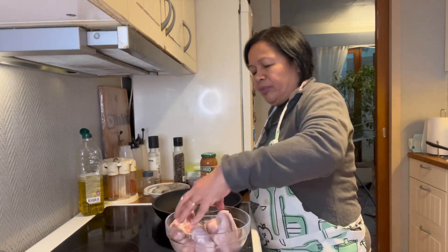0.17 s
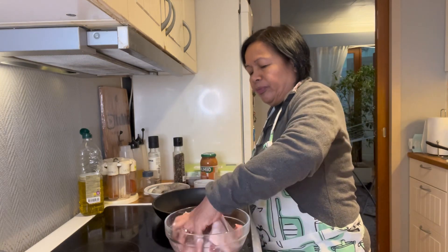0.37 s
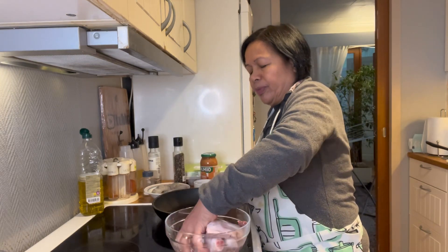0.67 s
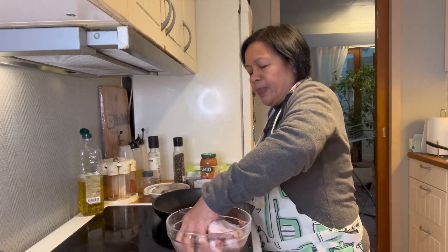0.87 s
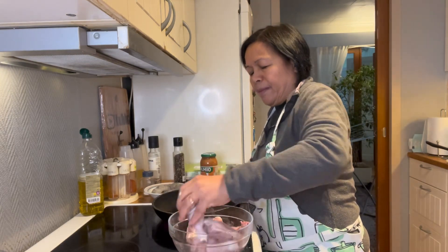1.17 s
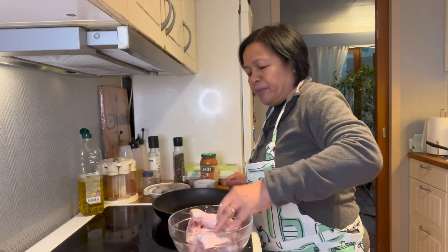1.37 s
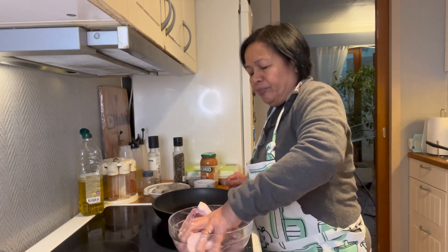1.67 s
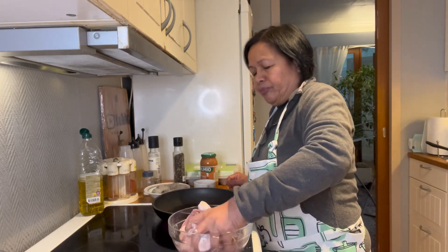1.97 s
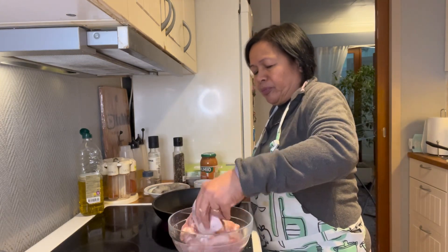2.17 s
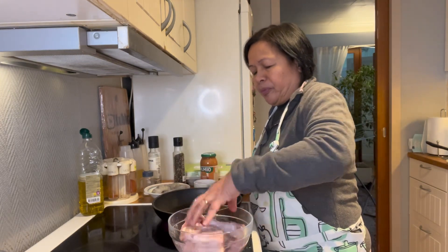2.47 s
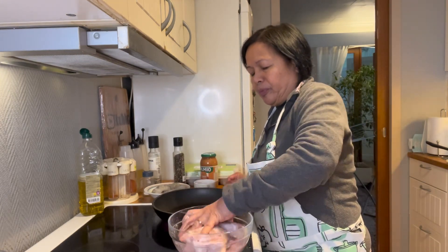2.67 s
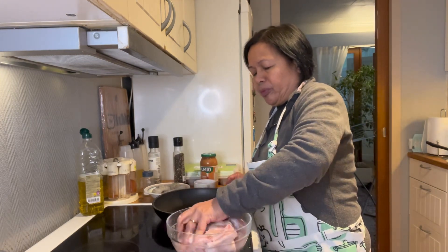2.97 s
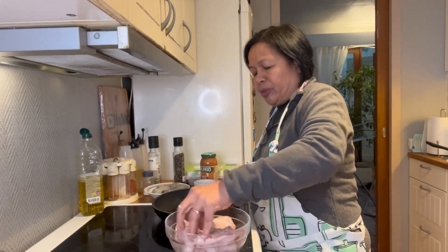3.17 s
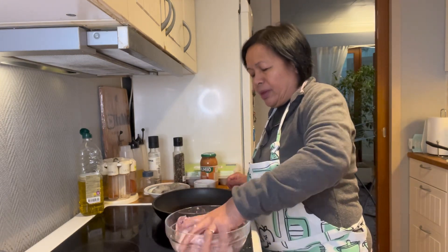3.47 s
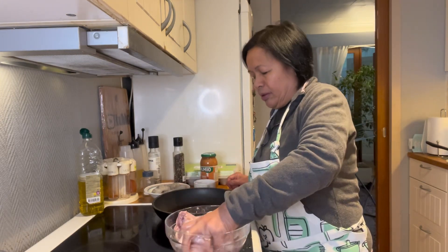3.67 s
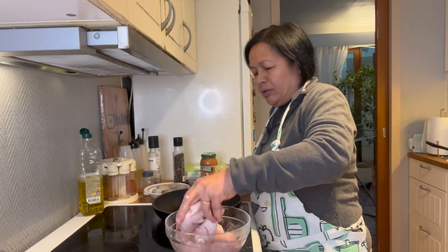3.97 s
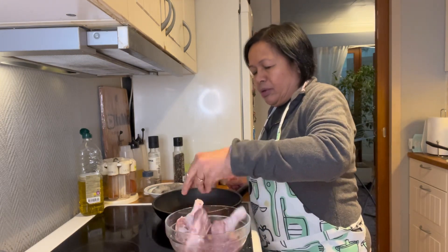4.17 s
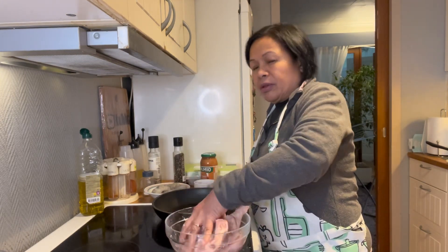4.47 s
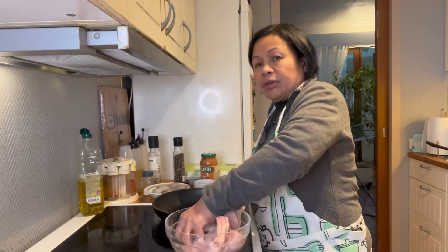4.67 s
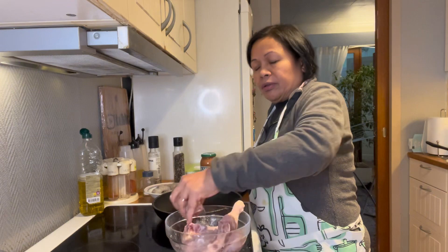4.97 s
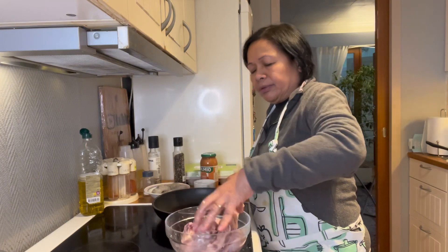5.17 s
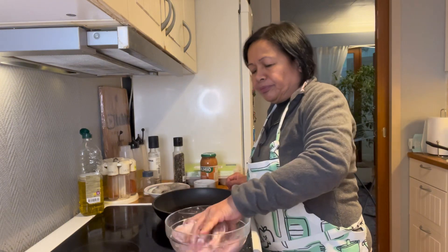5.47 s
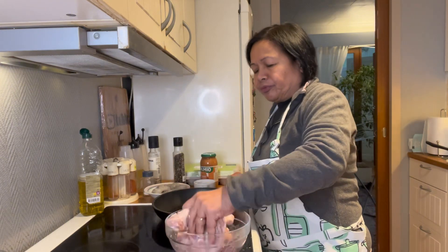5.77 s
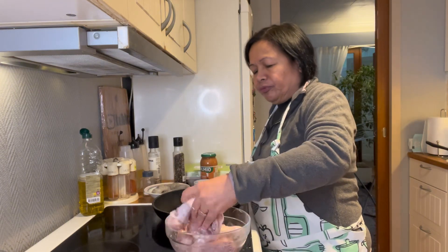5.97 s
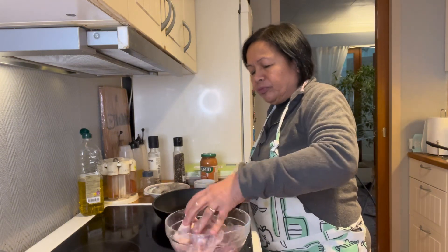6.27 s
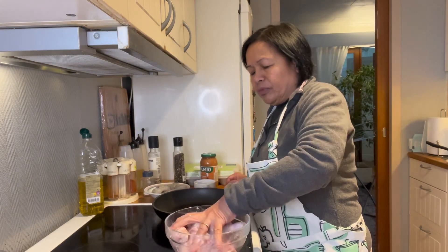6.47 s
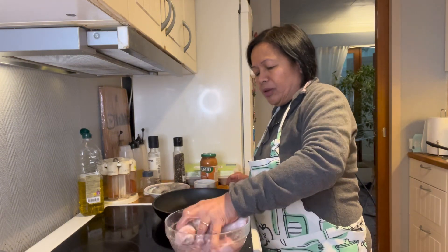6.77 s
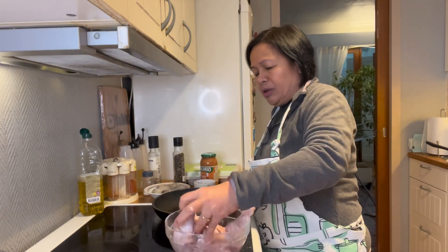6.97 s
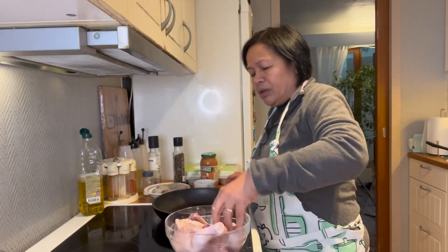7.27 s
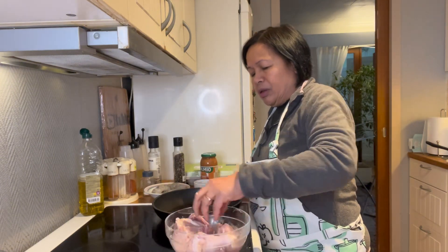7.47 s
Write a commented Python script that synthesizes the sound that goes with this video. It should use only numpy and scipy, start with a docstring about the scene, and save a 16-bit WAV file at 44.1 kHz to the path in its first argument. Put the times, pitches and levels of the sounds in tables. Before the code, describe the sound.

Wet chicken pieces squish and slap under a mixing hand while their glass bowl bumps the hob and occasionally clinks.

```python
"""A small kitchen, where a hand turns oiled raw chicken in a glass bowl on a glass hob.
Impacts excite normal modes: the bowl thumps the hob, and now and then bone or a ring clinks on the bowl.
Cavities resonate as the pieces slap together and air pockets suck open; the oil film ticks as it tears.
Under these lie squelching, rubbing, a low rumble and the still air. The sound is heard from the counter,
both directly and as the room's reverberation, with a stereo colouring that widens it."""
import sys
import numpy as np
from scipy import signal
from scipy.fft import rfft, irfft, next_fast_len
from scipy.io import wavfile
from scipy.ndimage import uniform_filter1d, map_coordinates

SR = 44100
rng = np.random.default_rng(int(sys.argv[2]) if len(sys.argv) > 2 else 0)


def log_audio(samples):
    """Write samples as a 16-bit WAV file to the path given in sys.argv[1]."""
    # one column per channel
    frames = np.atleast_2d(samples).T
    # limit to full scale, then quantise
    limited = np.clip(frames, -1, 1)
    pcm = np.round(limited * 32767).astype(np.int16)
    wavfile.write(sys.argv[1], SR, pcm)


N = 335160

# The still air. Each row: frequency in Hz, relative spectral density in dB.
AIR_SPECTRUM = [(15, -43), (25, -19), (66, -2.5), (113, 0), (221, -24), (305, -4), (378, -18), (826, -18.5),
                (2560, -49.5), (5580, -30), (7700, -31), (11200, -29.5), (15500, -78)]
# The kitchen's reverberation. Each row: frequency in Hz, time to fall 60 dB in seconds, gain in dB.
ROOM_DECAY = [(106, 0.7, -6.5), (475, 0.23, 0), (970, 0.3, -1), (1830, 0.27, -0.5), (4900, 0.23, -0.5),
              (11500, 0.44, -5)]
# Stereo width of the background and reverberation: centred in the bass, wide in the middle, mono above
# 11 kHz. Each row: frequency in Hz, left-right likeness from 0 (wide) to 1 (mono).
STEREO_LIKENESS = [(60, 1), (150, 0.86), (300, 0.68), (600, 0.17), (3000, 0.0057), (8000, 0.21), (11000, 1)]
# The hand at work. Each row: time in seconds, then levels in dB of hob rumble, squish and oil fizz.
HAND_EFFORT = [(0.0, -85, -88, -102), (0.08, -52, -80, -68), (0.22, -59.5, -77, -93), (0.38, -52, -74, -72),
               (0.82, -59, -74, -77.5), (1.33, -68, -83.5, -109), (1.52, -56, -64, -74),
               (1.74, -45.5, -62, -66), (2.08, -59.5, -85, -89), (2.2, -60, -71, -59),
               (2.36, -72, -98, -97), (2.55, -55, -65, -68.5), (2.79, -59, -68.5, -71),
               (3.1, -50, -80, -79), (3.41, -62.5, -83, -106), (3.68, -53, -67, -68),
               (4.04, -51.5, -75, -78), (4.42, -51.5, -63.5, -72), (4.6, -56, -65, -67),
               (4.69, -61, -90, -64), (4.82, -63, -75, -77), (5.08, -63.5, -103, -97),
               (5.35, -56.5, -71, -78), (5.65, -53.5, -70, -59.5), (5.88, -57.5, -82, -102),
               (6.39, -62.5, -78, -104), (6.58, -54, -69, -72), (6.74, -61, -78.5, -80),
               (6.86, -69, -77, -75), (6.96, -62, -65.5, -68.5), (7.17, -55.5, -76.5, -87),
               (7.42, -55.5, -77, -93), (7.6, -60.5, -59.5, -73)]
# The hob under the hand's weight. Each row: frequency in Hz, relative spectral density in dB.
RUMBLE_SPECTRUM = [(25, -2), (45, 11.5), (65, 5.5), (110, 6.5), (200, -5), (330, -10), (420, -38.5)]
# Skin sliding over wet meat. Each row: time in seconds, level in dB.
RUB_LEVELS = [(0.0, -76.5), (0.08, -85), (0.38, -73.5), (1.33, -85.5), (1.5, -76.5), (1.78, -68.5),
              (2.09, -77.5), (2.24, -78), (2.5, -83), (2.67, -80.5), (3.02, -67), (3.24, -93), (3.51, -78),
              (3.68, -71), (4.13, -79), (4.36, -72), (4.66, -80.5), (4.91, -91), (5.14, -79), (5.33, -76),
              (5.63, -73), (5.88, -83), (6.43, -84), (6.58, -71.5), (7.22, -86), (7.6, -72)]
# Modes of the bowl. Each row: frequency in Hz, relative level in dB, time to fall 60 dB in seconds.
BOWL_MODES = [(452, -4, .45), (1204, -4, .63), (2215, -5, .2), (3430, -4, .1), (4826, -5, .07),
              (6360, -8, .055)]
# Bone or ring on the glass. Each row: start in seconds, level in dB, hardness in dB per octave,
# relative level of the rim's sway in dB, seconds until the meat damps it, factor on the decay times.
BOWL_CLINKS = [(0.245, -61.5, 3.5, 8, 0.017, 2.6), (2.490, -49, -2.5, -6, 0.038, 1.3),
               (2.534, -49, 0.5, -7, 0.03, 1.9), (4.193, -40.5, -18, -1, 0.02, 1.1),
               (4.209, -31, -45, -19, 0.3, 0.8), (4.375, -54.5, 1, -5, 0.095, 2.1),
               (5.219, -52, 8, -2.5, 0.44, 1.3), (7.247, -52, -31, 14, 0.16, 0.94)]
# Modes of the hob. Each row: frequency in Hz, relative level in dB, time to fall 60 dB in seconds.
HOB_MODES = [(60.95, -1, 0.53), (76.8, -16, 0.76), (101.85, -2, 0.35), (130, -2, 0.33), (145.7, -3, 0.2),
             (175, 1.5, 0.22), (223.8, -0.5, 0.14), (267.7, 7, 0.16), (318.3, 5.5, 0.26),
             (396.8, -1.5, 0.31)]
# The bowl landing on the hob. Each row: start in seconds, peak level in dB, centre frequency in Hz.
HOB_THUMPS = [(0.064, -39.5, 85), (0.268, -31.5, 109), (0.271, -28, 186), (0.292, -37, 150),
              (0.348, -31, 166), (0.821, -43.5, 124), (1.324, -41, 122), (1.395, -29.5, 208),
              (1.406, -27.5, 136), (1.663, -37, 170), (1.68, -30.5, 130), (1.706, -40, 111),
              (1.74, -34.5, 111), (1.858, -33, 120), (2.141, -38.5, 95), (2.221, -42, 62),
              (2.475, -44, 176), (2.5, -31, 136), (2.545, -41.5, 116), (2.597, -38, 104), (2.715, -39, 130),
              (2.729, -33.5, 118), (2.886, -42.5, 159), (2.893, -37, 148), (3.028, -40, 193),
              (3.582, -41, 125), (3.646, -44, 130), (3.663, -39.5, 106), (3.805, -47, 70),
              (3.894, -30.5, 130), (4.027, -50.5, 137), (4.209, -27, 182), (4.219, -28.5, 159),
              (4.371, -41.5, 184), (4.603, -46, 81), (4.789, -43.5, 83), (4.866, -47, 104),
              (5.153, -44.5, 69), (5.213, -36, 126), (5.25, -40.5, 119), (5.267, -41, 117),
              (5.52, -42, 120), (5.538, -33, 107), (5.618, -41, 110), (5.653, -32, 121), (5.691, -32, 130),
              (5.771, -40, 99), (5.873, -49, 85), (6.081, -32.5, 135), (6.152, -37, 118),
              (6.456, -33.5, 109), (6.5, -43, 107), (6.954, -30.5, 126), (6.996, -34.5, 112),
              (7.258, -32, 162), (7.368, -38.5, 190)]
# Air pockets sucking open. Each row: start in seconds, level in dB, pitch in Hz, decay time in cycles.
POCKET_POPS = [(0.886, -50, 642, 2.8), (0.965, -48, 3950, 20), (1.025, -59.5, 795, 2.3),
               (1.067, -44.5, 683, 5.1), (1.31, -50, 635, 2), (1.718, -40, 580, 3.6),
               (2.623, -48.5, 850, 2.2), (2.624, -43.5, 3940, 11), (4.029, -40, 3420, 5.3),
               (4.7055, -45.5, 2930, 11.4), (4.795, -44, 880, 4.6), (4.796, -54, 1420, 10.4),
               (4.832, -49.5, 828, 4), (4.996, -54, 664, 2.7), (5.297, -41, 847, 7.3),
               (5.5362, -39, 6250, 5.2), (7.205, -60.5, 1380, 3.7)]
# The oil film tearing. Each row: start in seconds, level in dB, centre in Hz, hiss over snap in dB.
FILM_TICKS = [(0.0434, -37.5, 4900, 10), (0.052, -38.5, 3120, -17), (0.197, -69, 9000, 8),
              (0.2594, -35.5, 3000, -49), (0.271, -33, 3450, -30), (0.329, -37.5, 2240, -25),
              (0.3439, -50, 2930, -21), (0.398, -48.5, 8050, 11.5), (0.535, -54.5, 8500, 8.5),
              (0.709, -52.5, 5200, 5), (0.721, -53, 2500, -15), (0.765, -51.5, 5600, -23),
              (0.8, -50, 5800, -23), (0.872, -52, 5800, -13), (0.889, -52, 4150, -1),
              (0.9936, -46.5, 3470, -31), (1.066, -44, 5100, -25), (1.155, -46.5, 11800, -10),
              (1.291, -45.5, 2700, -10), (1.293, -48.5, 4600, 7), (1.428, -53, 8400, -14),
              (1.551, -54, 5040, -4), (1.583, -69, 5000, 3), (1.606, -53, 4930, -1),
              (1.636, -50, 5700, 4.5), (1.719, -44, 3100, -17), (1.7345, -48, 4340, -13),
              (1.758, -60, 9000, 16), (1.7904, -41.5, 3940, -1), (1.8283, -39, 4240, -22),
              (1.9131, -50, 3100, 12), (2.038, -54, 5060, -4), (2.108, -38, 4580, -2),
              (2.1282, -33, 3500, 2.5), (2.1303, -26.5, 3000, -19), (2.218, -40.5, 5100, -15),
              (2.363, -66, 7350, 17.5), (2.466, -46.5, 6200, 8.5), (2.4996, -46, 3180, -5),
              (2.5366, -46.5, 3450, 3), (2.6728, -47.5, 4940, -23), (2.762, -46, 3060, -7),
              (2.7753, -47.5, 2830, -13), (2.7978, -42, 4800, -25), (2.8647, -48, 4060, -19),
              (2.8837, -66, 3050, -23), (2.9044, -40, 3830, -13), (2.953, -56.5, 7000, 17.5),
              (3.013, -37.5, 8000, 1), (3.0253, -38, 5230, -17), (3.1447, -48, 4420, 2.5),
              (3.2804, -51.5, 4700, 1), (3.414, -67.5, 7000, 20), (3.441, -59, 5000, -20),
              (3.4748, -55, 5000, -5), (3.491, -40.5, 3460, -3.5), (3.5463, -46, 2430, 5),
              (3.6127, -36, 4230, 11), (3.642, -47, 4000, -5), (3.7, -56, 9700, -5), (3.7373, -41, 5350, 8),
              (3.8112, -46, 3400, 3), (3.844, -41.5, 3470, -8), (4.065, -45, 9200, -8),
              (4.1175, -50, 6260, 6.5), (4.1674, -56.5, 3900, 15.5), (4.2078, -29, 3180, -32),
              (4.222, -31, 1880, -30), (4.299, -41, 4350, -10), (4.445, -45, 2230, -9),
              (4.506, -59, 7040, 14), (4.525, -38.5, 4600, 5), (4.779, -44, 4140, 1),
              (4.797, -61, 3420, -20), (4.833, -48.5, 4260, -18), (4.885, -55, 3950, -18),
              (4.996, -57, 2310, 5), (5.1124, -45.5, 5840, 10), (5.1376, -38.5, 3550, 2.5),
              (5.22, -46, 3500, -31), (5.2824, -40, 3600, 2.5), (5.3768, -44.5, 2600, -1),
              (5.4103, -40, 2470, -5), (5.441, -54, 3400, -17), (5.515, -52, 3100, 7.5),
              (5.6142, -46, 5200, 7), (5.6441, -38, 2750, -35), (5.6838, -38, 2860, -30),
              (5.98, -52, 9050, -4), (6.047, -48.5, 2620, 7), (6.0752, -36, 2760, -27),
              (6.148, -41.5, 10900, -20), (6.3495, -68.5, 7000, 22.5), (6.3882, -58.5, 5170, 14.5),
              (6.413, -48.5, 2380, -21), (6.439, -49, 3050, -24), (6.49, -49.5, 4150, -2),
              (6.5206, -50, 2820, 10), (6.5423, -34.5, 7100, -27), (6.558, -44.5, 2460, 6.5),
              (6.6046, -44.5, 4320, 6), (6.765, -54, 5460, 9.5), (6.881, -56, 7000, 17),
              (6.928, -46.5, 2820, 12.5), (6.96, -44, 6200, -15), (6.991, -50.5, 6160, 6),
              (7.062, -43, 9500, -4), (7.1591, -42.5, 5860, -10), (7.197, -42.5, 6140, -12),
              (7.2794, -47.5, 4700, -2), (7.3602, -55, 3540, 11.5), (7.405, -54, 5330, -20),
              (7.57, -54, 6500, -24)]
# Two resonances that colour the hiss of a tear. Each row: centre in Hz, quality factor.
HISS_BANDS = [(11900, 0.4), (13900, 0.6)]
# Meat on meat. Each row: start in seconds, level in dB, cavity resonance in Hz, spray over slap in dB.
MEAT_SLAPS = [(0.05, -43.5, 1350, 2), (0.259, -32.5, 1030, -8), (0.269, -23.5, 790, -6.5),
              (0.292, -35, 1500, -24), (0.341, -33.5, 560, 3), (0.522, -51, 780, -5.5),
              (0.554, -48, 624, -18), (0.968, -53, 497, -23), (1.392, -30.5, 470, -17),
              (1.659, -37.5, 540, -0.5), (1.791, -36, 1340, -12), (1.848, -39, 700, -29),
              (1.915, -48.5, 1190, -12), (1.995, -50, 2030, -27), (2.129, -35, 1500, -4),
              (2.138, -49, 1550, -18), (2.463, -60, 1510, 10), (2.496, -38.5, 660, -1),
              (2.708, -41, 644, -1), (2.885, -39, 620, -6), (3.014, -43.5, 870, -3),
              (3.024, -34.5, 690, -26), (3.145, -49, 560, 4.5), (3.191, -53, 485, -27),
              (3.492, -47.5, 950, -3), (3.545, -55.5, 1270, 10), (3.613, -45, 1800, 6.5),
              (3.642, -48.5, 604, -24), (3.885, -35, 590, -15), (4.066, -49.5, 476, -2),
              (4.165, -49, 626, -20), (4.193, -33, 710, -5.5), (4.208, -24.5, 660, -11),
              (4.224, -34.5, 790, -6), (4.604, -52, 900, -10), (4.622, -47.5, 880, -13),
              (5.109, -53.5, 640, 2), (5.223, -41, 475, 0.5), (5.433, -49.5, 1240, -22),
              (5.518, -44, 564, 2.5), (5.644, -32.5, 560, -7.5), (5.683, -34, 547, -1),
              (5.793, -47.5, 1440, -29), (6.077, -30, 490, -2), (6.439, -39, 580, -1.5),
              (6.564, -47, 1130, -1), (6.77, -55, 1900, -20), (6.949, -44.5, 730, -15),
              (7.001, -46.5, 535, -15), (7.244, -35, 530, -36)]
# Acoustic shadow on direct sound. Each row: frequency in Hz, left over right in dB.
DIRECT_SHADOW = [(350, -2), (750, 13.5), (1200, -1), (4000, -1)]
# The colour that both channels share. Each row: frequency in Hz, gain in dB.
SHARED_GAIN = [(25, -20.5), (60, 3), (6000, -4.5), (7800, -7.5), (10000, -8), (13600, -11), (14300, -19),
               (15700, -38)]
# A left-right phase shift that widens the sound. Each row: frequency in Hz, lead of the left in radians.
LEFT_LEAD = [(60, 0.22), (180, 0.52), (300, 0.91), (500, 1.95), (750, 2.5), (1210, 5.69), (2070, 6.6),
             (2840, 3.7), (3880, 8.08), (6800, 14.76), (9300, 17.5), (10100, 16.77), (12500, 23.2),
             (14000, 20.2)]
# Stereo balance. Each row: frequency in Hz, left over right in dB.
LEFT_GAIN = [(60, 0.5), (150, 2), (380, -0.5), (650, 0), (950, 0.5), (2380, 1.5), (5980, -2.5),
             (15000, 2.5)]

TAILS = 5  # independent reverberant tails, each fed by a track; one more track bypasses the room
CLUMPS_PER_S = 30  # rate at which the wet grains change level together
SIDES = np.array([[.5], [-.5]])  # splits a difference between left and right


def amp(db):
    """Amplitude ratio of a level in decibels."""
    return 10 ** (np.asarray(db) / 20)


def unit(x):
    """Normalisation to an rms of 1."""
    return x / np.sqrt(np.mean(x ** 2) + 1e-20)


def peak(x, db):
    """Normalisation of the largest swing to a level in dB."""
    return amp(db) * x / np.abs(x).max()


def along(points, hz):
    """Interpolation of a table's second column on a logarithmic frequency axis."""
    rows = np.transpose(points)
    return np.interp(np.log(hz + 1), np.log(rows[0] + 1), rows[1])


def envelope(points, column=1):
    """Amplitude at each sample, by interpolation of levels in dB over time."""
    rows = np.transpose(points)
    return amp(np.interp(np.arange(N) / SR, rows[0], rows[column]))


def filtered(x, response):
    """Linear filtering: the spectrum is multiplied by a frequency response."""
    size = next_fast_len(x.shape[-1] + 4096)
    return irfft(rfft(x, size) * response(np.fft.rfftfreq(size, 1 / SR)), size)[..., :x.shape[-1]]


def resonance(hz, q):
    """Band-pass response of a damped oscillator, with gain 1 at hz."""
    return lambda f: 1j * f * hz / q / (hz * hz - f * f + 1j * f * hz / q)


def stereo_spread(pair, spectrum):
    """Mid-side mixing: two independent signals are coloured and given a width that varies with pitch."""
    def weights(hz):
        angle = np.arccos(np.clip(along(STEREO_LIKENESS, hz), -1, 1)) / 2
        return amp(along(spectrum, hz)) * [np.cos(angle), np.sin(angle)]
    mid, side = filtered(pair, weights)
    return np.array([mid + side, mid - side])


def spatter(t, spread_s):
    """Impulsive noise: two trains of pressure steps swell and die within a few times spread_s."""
    age = t / np.clip(spread_s, .0002, .02)
    steps = rng.standard_normal((2, len(t))) * rng.exponential(1, len(t)) * age ** 2 * np.exp(-1.6 * age)
    return steps / np.linalg.norm(steps, axis=1, keepdims=True)


def add(tracks, k, start, sound, pan_db=0, shelter_db=0):
    """Superposition of event k; a source deep in the bowl reaches the room weaker by shelter_db."""
    i = round(start * SR)
    n = min(len(sound), N - i)
    panned, room_share = sound[:n] * amp(pan_db * SIDES), amp(-shelter_db)
    tracks[k % TAILS, :, i:i + n] += room_share * panned
    tracks[TAILS, :, i:i + n] += (1 - room_share) * panned


def still_air():
    """Ambient noise: a faint, steady background fills the kitchen."""
    return amp(-66.5) * unit(stereo_spread(rng.standard_normal((2, N)), AIR_SPECTRUM))


def reverberation(tracks):
    """Reverberant decay: the room's answer dies exponentially, each frequency at its own rate."""
    hz, t, noise = signal.stft(rng.standard_normal((TAILS, 2, SR // 3)), SR, nperseg=256)
    t60 = along(ROOM_DECAY, hz)[:, None]
    tails = signal.istft(noise * amp(-60 * t / t60) / np.sqrt(t60), SR, nperseg=256)[1]
    tails /= np.linalg.norm(tails, axis=-1, keepdims=True)
    colour = np.array(ROOM_DECAY)[:, ::2]
    tails = np.array([stereo_spread(pair, colour) for pair in tails])
    delayed = np.pad(tails, ((0, 0), (0, 0), (130, 0)))  # reflections arrive 3 ms late
    return signal.oaconvolve(tracks, delayed, axes=-1)[..., :N].sum(0)


def hob_rumble():
    """Forced vibration: the hand's weight keeps the hob rumbling in lumps."""
    lumps_db = 2.0 * map_coordinates(rng.standard_normal(N // 3000 + 4), [np.arange(N) / 3000])
    noise = filtered(rng.standard_normal(N), lambda hz: amp(along(RUMBLE_SPECTRUM, hz)))
    return envelope(HAND_EFFORT) * unit(amp(lumps_db) * noise)


def skin_rub():
    """Sliding friction: tiny random slips of skin over wet meat make a broad band of noise."""
    slips = rng.standard_normal(N) * rng.exponential(1, N)
    return envelope(RUB_LEVELS) * unit(filtered(slips, lambda f: resonance(1880, q=0.72)(f) ** 2))


def wet_grains(count, hz, octaves, decay_cycles):
    """Damped oscillation: many small bubbles or ticks of random size and pitch sound in sticky clumps."""
    rise_cycles, size_scatter_db, clump_scatter_db = 0.27, 6, 5.5
    when, tone, size = rng.random((count, 3)).T
    pitch = np.clip(hz * 2 ** (octaves * (2 * tone - 1)), 100, 15000)[:, None]
    samples = np.arange(400)
    cycles = pitch * samples / SR
    shape = np.exp(-cycles / decay_cycles) * (1 - np.exp(-cycles / rise_cycles))
    clumps_db = clump_scatter_db * rng.standard_normal(int(CLUMPS_PER_S * N / SR) + 2)
    clump = (when * N / SR * CLUMPS_PER_S).astype(int)
    level_db = clumps_db[clump] - size_scatter_db * np.log(size + 0.058)
    grains = amp(level_db)[:, None] * shape * np.sin(2 * np.pi * cycles)
    index = (when * N).astype(int)[:, None] + samples
    return unit(np.bincount(index.ravel(), grains.ravel(), N)[:N])


def squelch(tracks):
    """Incoherent addition: bubbles, oil fizz and rubbing merge into a texture that follows the hand."""
    squish = envelope(HAND_EFFORT, 2) * wet_grains(count=1600, hz=1060, octaves=1.126, decay_cycles=2.1)
    fizz = envelope(HAND_EFFORT, 3) * wet_grains(count=7000, hz=6190, octaves=1.29, decay_cycles=1.27)
    texture = squish + fizz + skin_rub()
    tail = np.arange(N) * CLUMPS_PER_S // SR % TAILS  # successive clumps feed different tails
    for k in range(TAILS):
        tracks[k] += texture * uniform_filter1d(1. * (tail == k), size=400)


def bowl_clinks():
    """Free vibration: harder contact favours the bowl's upper modes, which ring until meat damps them."""
    damping_db_per_s, rise_s = 500, 0.00035
    out, t = np.zeros(N + SR), np.arange(SR // 2) / SR
    hz, mode_db, t60 = np.array(BOWL_MODES).T[:, :, None]
    for start, db, hardness, sway_db, free_s, decay_factor in BOWL_CLINKS:
        level_db = db + mode_db + hardness * np.log2(hz / hz[1])
        level_db[0] = db + sway_db  # the rim's sway depends on where the blow lands
        decay_db = 60 * t / (t60 * decay_factor) + damping_db_per_s * np.clip(t - free_s, 0, None)
        modes = amp(level_db - decay_db) * np.sin(2 * np.pi * hz * t)
        out[round(start * SR):][:len(t)] += modes.sum(0) * (1 - np.exp(-t / rise_s))
    return out[:N]


def hob_thumps():
    """Modal excitation: a landing favours low modes near its centre; a harder one adds upper modes."""
    upper_from_hz, rise_s, punch_s = 250, 0.0068, 0.016
    out, t = np.zeros(N + SR), np.arange(SR // 2) / SR
    hz, mode_db, t60 = np.array(HOB_MODES).T[:, :, None]
    attack = (1 - np.exp(-t / rise_s)) * (1 + 2.32 * np.exp(-t / punch_s))  # first cycles swing wider
    for start, db, centre_hz in HOB_THUMPS:
        scatter, detune = rng.standard_normal((2, len(HOB_MODES), 1))
        upper_db = -21.5 + 12 * np.log2(centre_hz / 130)
        lower_db = -11.5 * np.abs(np.log2(hz / centre_hz))
        level_db = mode_db + np.where(hz > upper_from_hz, upper_db, lower_db) + 3.04 * scatter
        modes = amp(level_db - 60 * t / t60) * np.sin(2 * np.pi * hz * (1 + 0.043 * detune) * t)
        out[round(start * SR):][:len(t)] += peak(modes.sum(0) * attack, db)
    return out[:N]


def pocket_pops(tracks):
    """Bubble resonance: an air pocket opens with a spatter and rings briefly, climbing in pitch."""
    opening_s, climb = 0.002, 0.103
    t = np.arange(SR // 10) / SR
    for k, (start, db, hz, cycles) in enumerate(POCKET_POPS):
        age = t * hz / cycles
        glide = 1 + climb * (np.minimum(age, 4) - 1) / 2
        ring = (1 - np.exp(-t / opening_s)) * np.exp(-age) * np.sin(2 * np.pi * hz * t * glide)
        rough = filtered(spatter(t, 2 * opening_s)[0], resonance(hz, q=9.3))
        add(tracks, k, start, peak(ring, db) + peak(rough, db), shelter_db=6)


def film_ticks(tracks):
    """Rupture: the oil film snaps and rings the gap, air hisses through, and the film peels on."""
    t = np.arange(SR // 20) / SR
    for k, (start, db, hz, hiss_db) in enumerate(FILM_TICKS):
        tear_s = 0.0016 * amp(0.25 * (db + 43.5))  # a louder tear lasts longer
        snap, hiss = spatter(t, tear_s)[0], spatter(t, spread_s=0.003)[1]
        pan_db = 5.5 * rng.standard_normal()
        peel = spatter(t, spread_s=0.01) * rng.exponential(1, len(t)) ** 2  # sparse, sticky steps
        snap, hiss = np.array([snap, hiss]) + amp(-10) * peel / np.linalg.norm(peel, axis=1)[:, None]
        snap = filtered(filtered(snap, resonance(hz, q=3.2)), resonance(hz, q=0.82))
        hiss = filtered(filtered(hiss, resonance(*HISS_BANDS[0])), resonance(*HISS_BANDS[1]))
        add(tracks, k, start, peak(snap, db), pan_db, shelter_db=3)
        add(tracks, k, start, peak(hiss, db + hiss_db), pan_db)


def meat_slaps(tracks):
    """Cavity resonance: pressure steps ring the air between the pieces, along with a broader spray."""
    t = np.arange(SR // 10) / SR
    for k, (start, db, hz, spray_db) in enumerate(MEAT_SLAPS):
        slap_s = 0.0037 * amp(0.09 * (db + 34.5))  # a louder slap spatters longer
        body, spray = spatter(t, slap_s)
        cutoff_hz = 5.7 * hz  # soft meat passes little above this
        body = filtered(body, lambda f: (resonance(hz, q=1.13)(f) / (1 + 1j * f / cutoff_hz)) ** 2)
        spray = filtered(filtered(spray, resonance(1080, q=1.0)), resonance(1800, q=0.32))
        add(tracks, k, start, peak(body, db) + peak(spray, db + spray_db), shelter_db=1.5)


def scene():
    """Superposition of direct sound, reverberation and the still air."""
    tracks = np.zeros((TAILS + 1, 2, N))
    for wet_source in (meat_slaps, pocket_pops, film_ticks, squelch):
        wet_source(tracks)
    hob, bowl = hob_thumps() + hob_rumble(), bowl_clinks()
    direct = filtered(tracks.sum(0), lambda hz: amp(along(DIRECT_SHADOW, hz) * SIDES)) + hob + bowl
    tracks[2] += amp(-11.5) * hob + amp(-15) * bowl  # both stand close and excite the room less
    return still_air() + direct + amp(4.0) * reverberation(tracks[:TAILS])


def record(dry):
    """Stereo colouring: a left-right phase shift that varies with frequency widens the sound."""
    def response(hz):
        gain = amp(along(SHARED_GAIN, hz) + along(LEFT_GAIN, hz) * SIDES)
        phase = along(LEFT_LEAD, hz) * SIDES
        return gain * np.exp(1j * phase) * (hz < 15720)  # band limit
    return filtered(dry, response)


dry = scene()
out = record(dry)
log_audio(out)
```